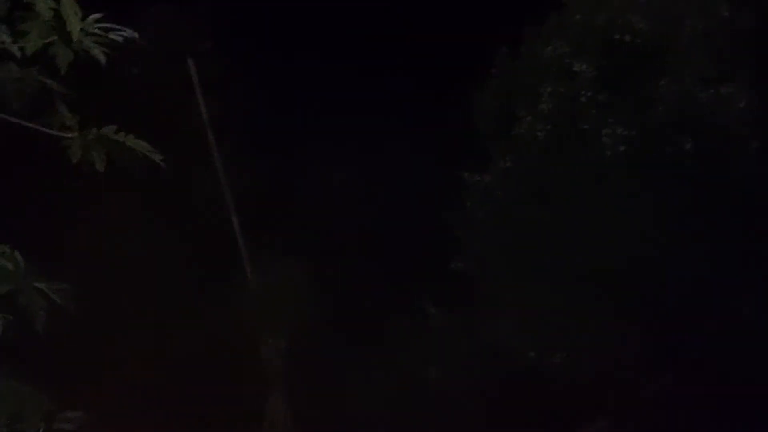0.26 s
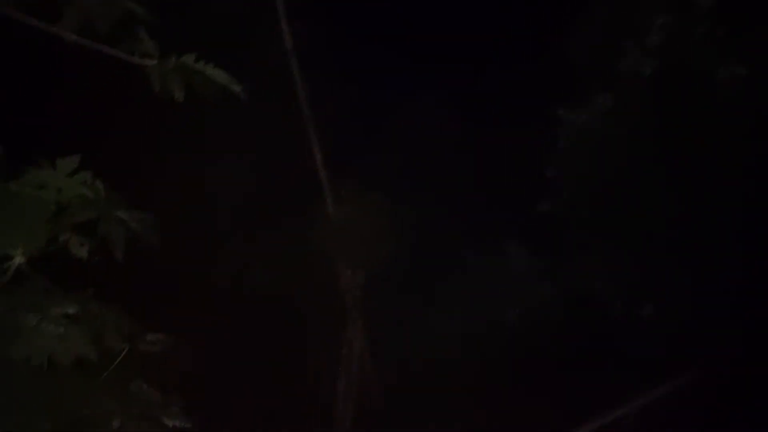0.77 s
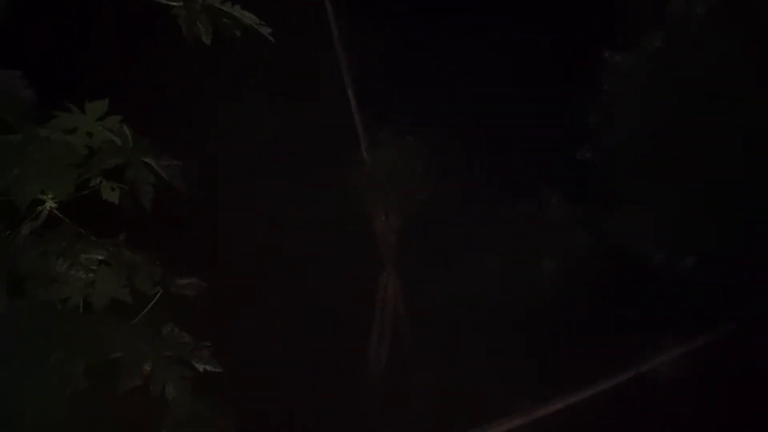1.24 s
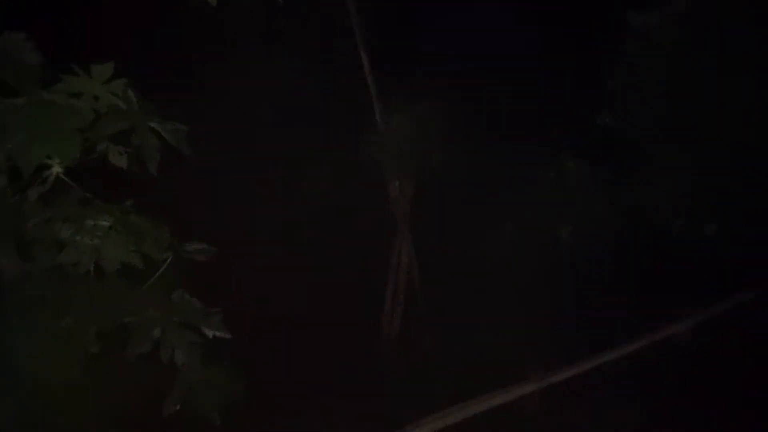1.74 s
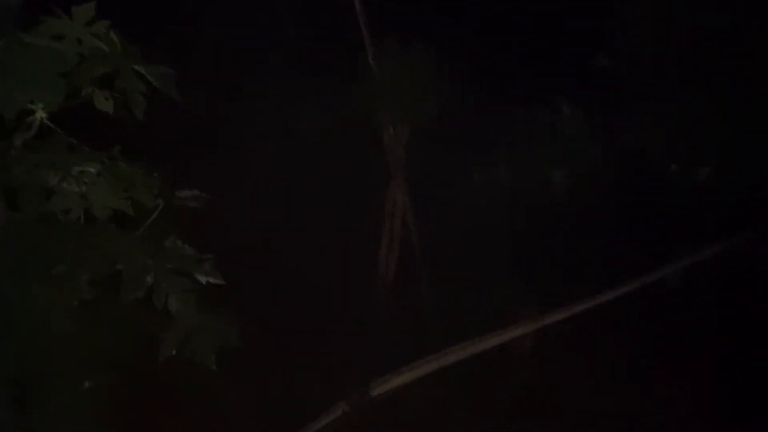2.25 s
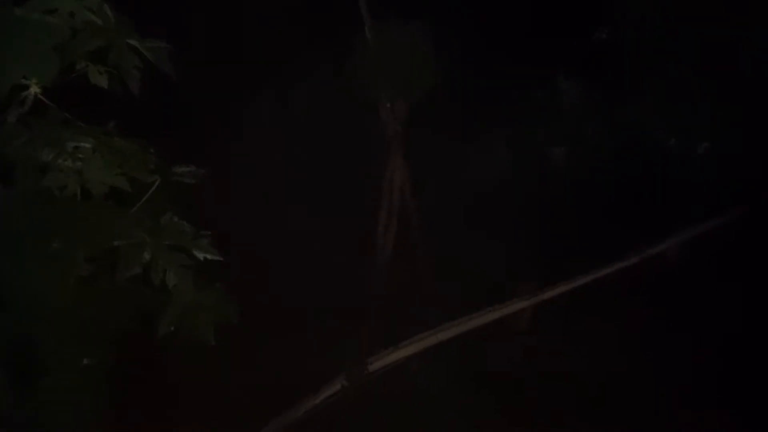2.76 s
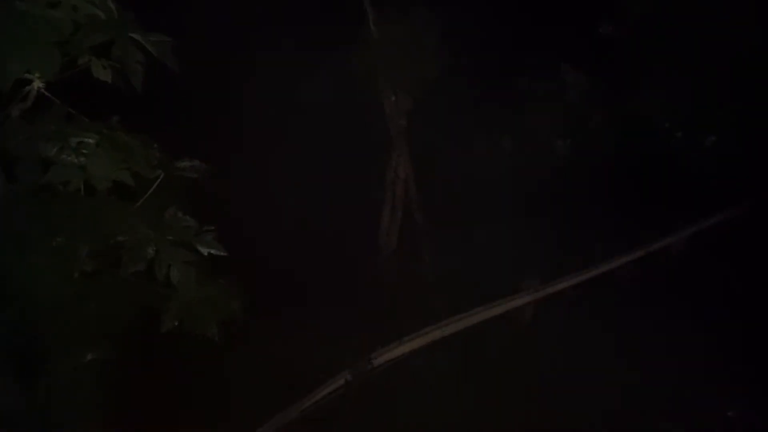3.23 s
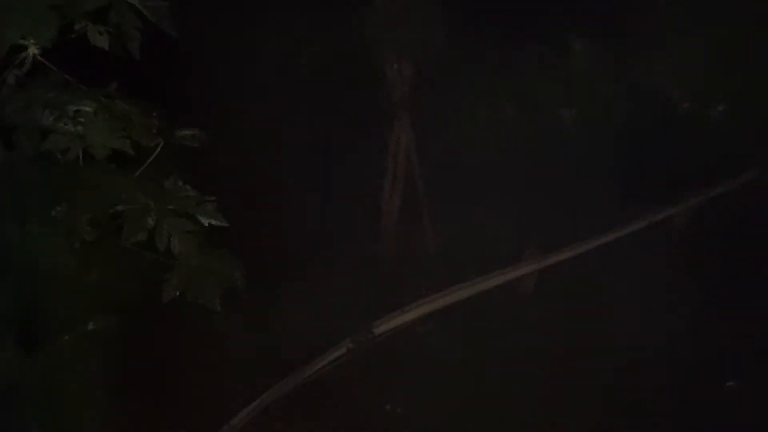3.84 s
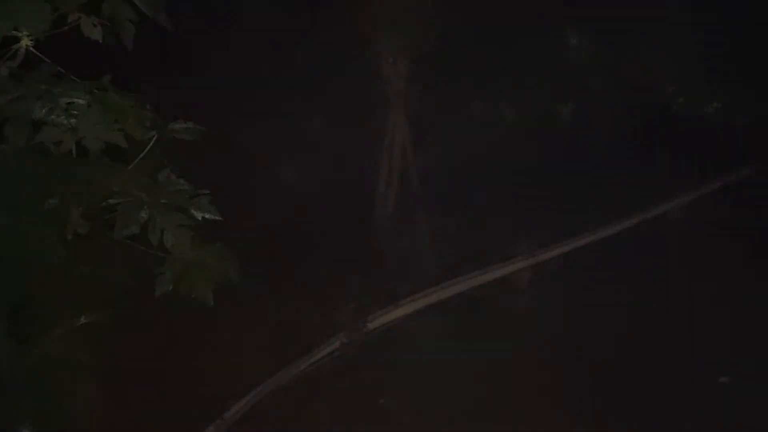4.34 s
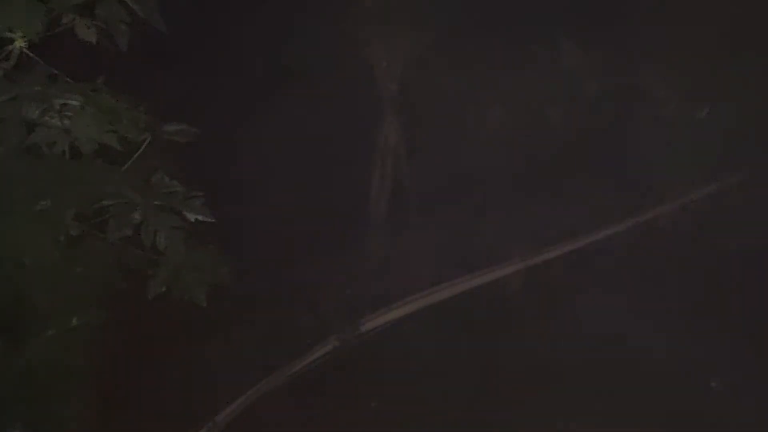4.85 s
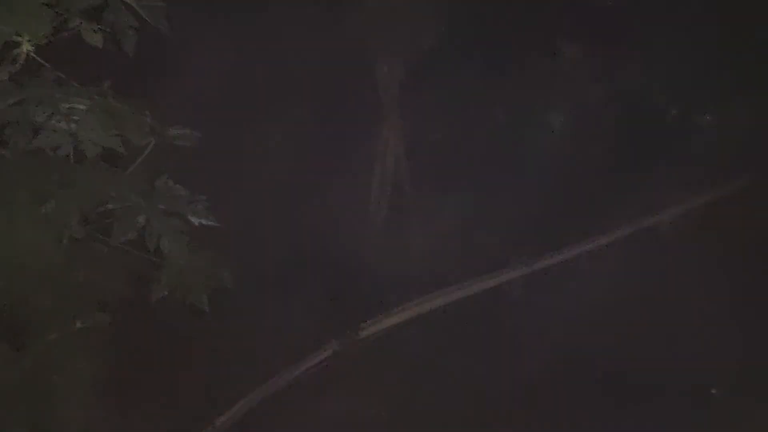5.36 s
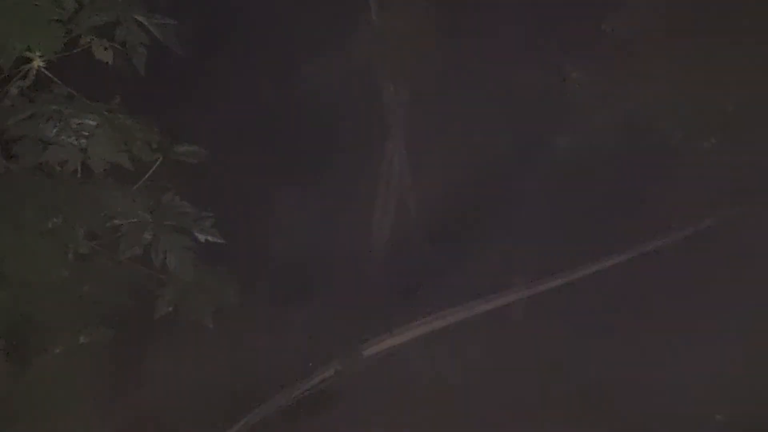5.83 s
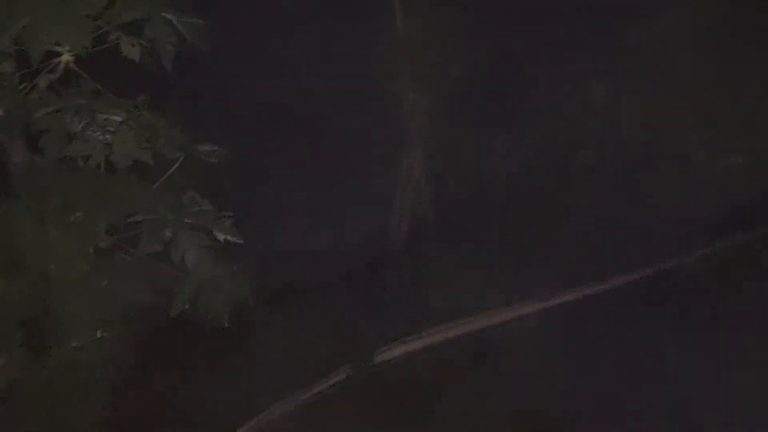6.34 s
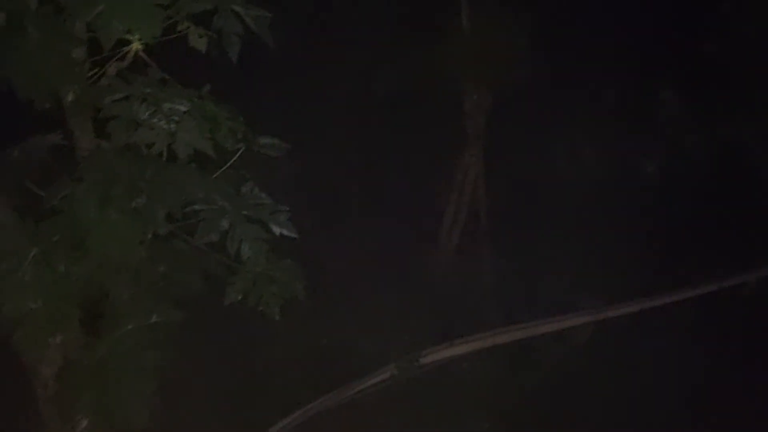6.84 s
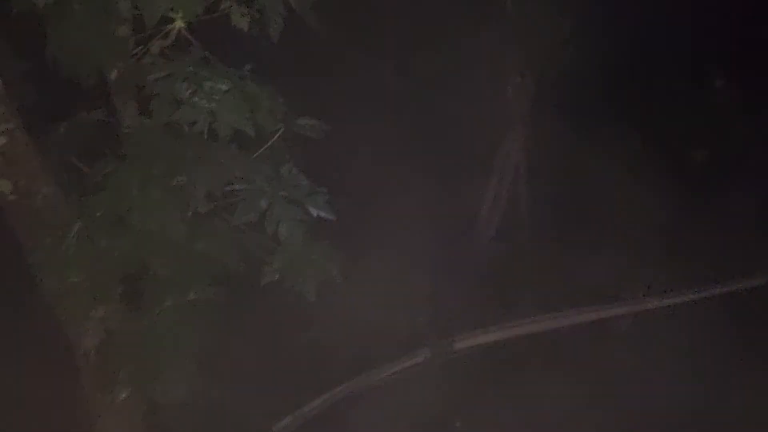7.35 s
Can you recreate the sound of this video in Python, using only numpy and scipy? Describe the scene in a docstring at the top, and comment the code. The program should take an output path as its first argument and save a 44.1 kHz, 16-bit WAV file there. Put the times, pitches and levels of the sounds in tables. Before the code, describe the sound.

Night insects layered near and far, heard in stereo from beside leafy bushes, weighted to the right. Quick pips and rasps begin over hissing air, low hum and steady high buzz; then a mid-high cricket trills in long runs while a close one throws in bright, rising chirps. Lower chirps cluster before three seconds, rolled chirps and a rapid row of five snaps follow past four, and trilling continues almost to the end.

```python
"""A garden at night, heard by a phone whose right port faces the bushes. From the start: shaped noise (air), a low beating
hum, a far chorus in flickering bands, a wash, and a katydid's buzz from regular strokes of hiss. Rolled chirps, pips,
rasps of filtered file clicks and throbbing low notes join early, then short chirps, rising at close range,
and a cricket's long trills of falling tones; five high snaps come past the middle.
Direct sound, ground, leaves and a hard surface give every near song a short echo."""
import sys
import numpy as np
from scipy import signal
from scipy.fft import rfft, irfft, next_fast_len
from scipy.io import wavfile
from scipy.ndimage import uniform_filter1d

SR = 44100
rng = np.random.default_rng(int(sys.argv[2]) if len(sys.argv) > 2 else 0)


def waveform_to_disk(signal):
    """Save audio, clipped to [-1, 1], as 16-bit WAV at the path in sys.argv[1]."""
    frames = np.transpose(np.atleast_2d(signal))
    scaled = np.clip(frames, -1, 1) * 32767
    samples = np.round(scaled).astype(np.int16)
    wavfile.write(sys.argv[1], SR, samples)


N = 334703
T = np.arange(N) / SR  # time [s]

# night air at the right port: (frequency [Hz], density [dB per Hz])
AIR_SPECTRUM = [(25, -108), (40, -97), (70, -86.5), (150, -91), (330, -96), (640, -107), (1500, -114.5),
                (2600, -116), (3600, -103), (7000, -103), (11000, -103), (15700, -110)]
# the two ports in the night air: (frequency [Hz], left minus right [dB], likeness [-1 to 1])
AIR_PORTS = [(60, -3.5, 0.59), (250, -2.5, 0.59), (645, 1, 0.043), (1410, 1.2, -0.14), (2600, 1.5, 0.22),
             (4000, -3, -0.33), (15000, -15.5, 0.024)]
# narrow wavering bands of the hum: (frequency [Hz], width [Hz], level against the swell [dB])
HUM_BANDS = [(98.3, 28, -8.5), (131, 19, -5), (204.3, 47, -12), (258.6, 26.4, -10.5)]
# steady tones in the hum, as of far motors: (frequency [Hz], level against the swell [dB])
MOTOR_TONES = [(127, -6.5), (133.5, -7.5), (150, -12.5), (196.5, -18.5), (202, -14.5)]
# swell of the hum: (time [s], level [dB], deepest band against it [dB])
HUM_SWELL = [(0, -62.5, -4), (1.5, -65, -1), (2.5, -66, -9), (3.6, -66.5, -10), (4.35, -58, -14),
             (4.7, -63, -17), (5.6, -68.5, -8), (6.4, -61, -12), (6.9, -66.5, -10), (7.59, -71.5, -26)]
# far chorus bands: (frequency [Hz], width [Hz], level [dB])
CHORUS_BANDS = [(3124, 210, -64), (4665, 430, -62.5), (5410, 790, -62.5), (6240, 590, -70),
                (2780, 76, -79.5), (3970, 840, -68.5), (2140, 340, -82.5)]
# far katydids that run together: (time [s], level [dB])
WASH_LEVELS = [(0, -55.5), (.35, -81), (.93, -64), (1.15, -82), (1.67, -59.5), (2.62, -59), (3.22, -69.5),
               (3.4, -54), (3.68, -61), (4.57, -77), (4.9, -69), (5.2, -77), (5.66, -59), (5.96, -64),
               (6.19, -57), (6.35, -58), (7.59, -75)]
# steady katydid buzz: (time [s], level [dB])
BUZZ_LEVELS = [(0, -57), (.76, -60), (.93, -52.5), (1.2, -58.5), (2.26, -55.5), (3.45, -56.5),
               (3.89, -52.5), (4.44, -58), (4.75, -55.5), (6.9, -55.5), (7.59, -59.5)]
# bouts of rolled chirps from a farther cricket: (first chirp [s], chirps [count], first level [dB], last level [dB])
ROLL_BOUTS = [(-.02, 1, -45, -45), (4.33, 9, -50.5, -47.5), (6.772, 1, -50, -50), (7.05, 1, -52, -52)]
# bouts of short steady pips: (first pip [s], pips [count], first level [dB], last level [dB])
PIP_BOUTS = [(0.019, 1, -49, -54), (.15, 5, -47, -42.5), (5.03, 1, -48, -50), (5.224, 4, -47.5, -49),
             (7.1, 4, -40.5, -43)]
# thin passing whistles: (middle [s], level [dB], middle pitch [Hz], length [s], fall [Hz])
WHISTLES = [(7.192, -57, 5780, 0.25, 37.3)]
# katydid rasps, Gaussian in time: (middle [s], nominal length [s], level [dB], voice [name])
RASP_CALLS = [(.06, .12, -64, "hollow"), (0.3, 0.16, -57, "even"), (0.442, .15, -62, "even"),
              (0.809, .21, -48.5, "even"), (0.926, 0.089, -46, "even"), (1.023, 0.16, -51, "even"),
              (1.31, 0.096, -43, "high"), (1.382, 0.091, -45.5, "high"), (1.484, 0.13, -38.5, "hollow"),
              (1.67, .09, -60, "even"), (1.938, 0.16, -49.5, "even"), (2.09, 0.12, -54.5, "hollow"),
              (2.369, 0.14, -51, "even"), (2.65, .13, -46.5, "even"), (3.275, .13, -38, "hollow"),
              (3.45, 0.14, -51, "middle"), (3.62, .18, -48.5, "even"), (3.903, 0.16, -52, "even"),
              (4.377, 0.18, -55.5, "even"), (4.74, .14, -58, "even"), (4.921, .21, -47.5, "even"),
              (5.524, .18, -48.5, "even"), (6.006, .13, -37.5, "hollow"), (6.168, .16, -52, "even"),
              (6.36, 0.18, -50, "even"), (6.432, .11, -55, "high"), (6.7, 0.13, -50, "middle"),
              (7.144, 0.096, -53.5, "middle"), (7.377, 0.12, -63, "even")]
# wing resonances of the rasps: (frequency [Hz], width [Hz])
WING_RESONANCES = [(8400, 2540), (11000, 2240), (14000, 3400)]
# colour of each voice: name: (level in first, second, third wing resonance [dB])
VOICE_COLOURS = {"even": (.1, -1.4, -1.3), "hollow": (-3.6, -10.5, 0), "high": (-13, -14.5, 0),
                 "middle": (-6, 0, -5.5)}
# low notes, perhaps a small frog: (start [s], length [s], level before FROG_PEAK_DB [dB], left minus right [dB])
FROG_NOTES = [(0.096, 0.094, -69, -16), (0.367, 0.102, -77.5, -13.5), (0.687, 0.132, -73, -6),
              (0.968, 0.104, -75, 0.0), (1.281, 0.134, -74, -8.0), (1.634, 0.084, -80, 0),
              (1.948, 0.128, -80, -3.0), (2.279, 0.12, -76, -8.5), (2.624, 0.108, -73, -11.0),
              (2.921, 0.098, -77.5, -9.0), (3.227, 0.09, -83, 1), (3.534, 0.169, -78, -5),
              (3.911, 0.056, -74, -3), (4.187, 0.096, -75, -6.5), (4.516, 0.126, -77.5, -3),
              (4.831, 0.11, -76, -10), (5.156, 0.124, -78, -3.5), (5.458, 0.144, -75, -6),
              (5.763, 0.146, -71, -4.5), (6.104, 0.148, -71, -4), (6.423, 0.092, -76.5, -6),
              (6.707, 0.167, -75.5, -16), (7.012, 0.084, -76, -15.0), (7.353, 0.062, -75, -16.5)]
# chirps of a lower singer, a soft stroke before the full ones:
# (last stroke [s], level [dB], full strokes [count], soft stroke against them [dB])
LOW_CHIRPS = [(.31, -50.5, 2, -5), (.58, -51.5, 2, -8), (2.012, -47.5, 1, -6), (2.259, -39, 2, -17),
              (2.505, -38.5, 2, -6), (2.749, -38, 2, -6), (2.948, -38, 1, -9), (7.2, -57, 2, 2)]
# four-stroke chirps close by:
# (last stroke [s], strongest stroke's level [dB], last pitch [Hz], left minus right [dB], first stroke's shortfall [dB])
CLOSE_CHIRPS = [(1.012, -24, 6010, -14, -20), (1.858, -30.5, 6230, -11, -17), (3.46, -26.5, 6090, -13, -14),
                (4.175, -28.5, 6250, -8.5, -17), (5.877, -24.5, 6110, -14, -17),
                (6.471, -27.5, 6220, -10, -16)]
# growth of a close chirp, one entry per stroke: (share of the first stroke's shortfall [ratio])
SHORTFALL_SHARES = [1, .48, 0, .05]
# runs of the trilling cricket, strokes evenly spaced between rows: (time [s], strokes so far [count], level [dB])
TRILL_RUNS = [
    [(.597, 0, -47.5), (.767, 5, -39.5), (1.012, 12, -39.5), (1.157, 15.5, -43), (1.39, 21, -42)],
    [(1.934, 0, -43.5), (2.072, 4, -40.5), (2.414, 14, -39), (2.534, 17, -41), (2.727, 21, -38.5),
     (2.762, 22, -41), (2.955, 27, -41), (3.007, 28, -46.5)],
    [(3.423, 0, -56.5), (3.49, 2, -43.5), (3.69, 8, -39.5), (3.931, 15, -39.5), (4.283, 24, -39.5),
     (4.435, 28, -41), (4.749, 37, -40), (4.824, 39, -40.5), (4.97, 42, -44)],
    [(5.429, 0, -41), (5.563, 4.5, -39.5), (5.869, 13, -37), (5.978, 16, -38.5), (6.173, 21, -36),
     (6.277, 23, -39), (6.366, 25, -37), (6.606, 32, -37), (6.75, 36, -37.5), (6.932, 41, -38.5),
     (7.012, 43, -38), (7.126, 45, -40.5)],
]
# perch of each run: (middle pitch [Hz], far echo [dB], near paths' left-port gain [dB])
TRILL_PERCHES = [(3300, 1.5, -3), (3285, -2, -8.5), (3270, -4, -11.5), (3285, -5, -10.5)]

# two close tones that beat; the lower one's level is against the upper
BEAT_HZ, BEATS_PER_S, BEAT_NULL_S = 104., 2.958, .17  # upper pitch, beat rate, a moment of cancelling
BEAT_DB, BEAT_LOWER_DB, DEEP_HZ = 1, -2, 49.
CHIRP_GAP_S, LOW_GAP_S, ROLL_GAP_S, PIP_GAP_S = .0462, .049, .2705, .1325
FROG_LEAD_S, FROG_PEAK_DB = .02, 8.5
CHIRP_RISE_HZ = 46.4  # from stroke to stroke
REACH_PER_DB, SHORTEST = .034, .4  # weaker strokes cover less of the file
LOW_HZ, LOW_SAG_HZ, LOW_PAN_DB = 5050, 60, -9.5  # last pitch, fall per stroke, left minus right
TRILL_SCATTER_DB, TRILL_SCATTER_S = 1.3, .0015
TICK_START_S, TICK_GAP_S, TICK_DB, FIRST_TICK_DB = 4.34, .0718, -23, -3
TOP_HZ = 15800


def undb(db):
    """Decibels are twenty times the logarithm of a pressure ratio; this returns the ratio."""
    return 10 ** (np.asarray(db) / 20)


def unit(x):
    """Root-mean-square pressure sets the level; scale it to 1."""
    return x / np.sqrt(np.mean(x ** 2))


def band(x, hz, width_hz, order=2):
    """A resonance passes a band of a signal; a higher order gives a flatter top and steeper edges."""
    size = next_fast_len(N)
    f = np.fft.rfftfreq(size, 1 / SR)
    gain = np.exp(-np.abs(np.sqrt(2) * (f - hz) / width_hz) ** order)
    return irfft(rfft(x, size) * gain)[..., :N]


def walk(rate):
    """Slow random fluctuation: levels about 0, held 1 / rate seconds and smoothed twice, with rms 1."""
    hold = int(SR / rate)
    steps = np.repeat(rng.standard_normal(N // hold + 1), hold)
    smooth = uniform_filter1d(uniform_filter1d(steps, hold), hold)
    return unit(smooth[:N])


def garden(x, left_db, leaves_db, echo_db, t60_s, wall_db=-15.5, wall_s=.038, shade_db=-1.5, ground_db=-6.0):
    """Multipath propagation: direct sound, ground, near leaves, one hard surface and each port's fading scatter."""
    t = np.arange(int(.6 * SR)) / SR
    near, far = rng.standard_normal((2, 2, len(t)))
    near *= np.exp(-t / 0.024)
    far *= np.exp(-np.log(1000) * t / t60_s) * (1 - np.exp(-t / 0.013))
    near = undb(leaves_db) * near / np.linalg.norm(near[0])
    far = undb(echo_db) * far / np.linalg.norm(far[0])
    far[:, int(wall_s * SR)] += undb(wall_db)
    for port, lag in enumerate((16, 0)):  # the left port hears later [samples]
        near[port, lag] += 1
        near[port, lag + int(.005 * SR)] -= undb(ground_db)
    # the phone's body shades the left port, by separate amounts for near paths and for sound from all round
    near = near * undb([[left_db], [0]])
    far = far * undb([[shade_db], [0]])
    x = x * np.ones((2, 1))
    out = 0
    for source, paths in ((x, near), (x[[1, 1]], far)):
        wet = signal.fftconvolve(source, paths, axes=1)[:, :N]
        # the paths spread a song in time; its energy follows the sum of their energies
        energy = np.linalg.norm(paths, axis=1) * np.std(source, axis=1)
        out = out + wet * (energy / np.std(wet, axis=1))[:, None]
    return out * np.std(x[1]) / np.std(out[1])  # the right port keeps the song's level


def add(out, s, db, hz, length_s, fall_hz, octave_db=-52.0, lean=0., bend=0.):
    """A gliding tone, as a file run over a scraper: lean moves the peak late, bend steepens the late fall."""
    t = np.arange(-length_s / 2, length_s / 2, 1 / SR)
    fall = fall_hz * (t ** 2 / (2 * length_s) + bend * t ** 3 / (3 * length_s ** 2))  # in cycles
    phase = 2 * np.pi * (hz * t - fall + rng.random())
    tone = np.sin(phase) + undb(octave_db) * np.sin(2 * phase)
    shape = np.sqrt(np.hanning(len(t))) * (1 + lean * t / length_s)
    at = (t * SR + s * SR).astype(int)
    inside = (at >= 0) & (at < N)
    out[at[inside]] += (undb(db) * shape * tone)[inside]


def bout(gap_s, first_s, count, first_db, last_db):
    """Periodic calling: times and levels of evenly repeated calls whose level drifts."""
    count = int(round(count))
    return zip(first_s + gap_s * np.arange(count), np.linspace(first_db, last_db, count))


def teeth(rate, jitter, scatter_db, decay_s):
    """Impulsive excitation by file teeth: uneven clicks that decay exponentially."""
    chance = rng.standard_normal((int(N / SR * rate * 1.2), 2))
    at = np.cumsum(SR / rate * np.exp(jitter * chance[:, 0])).astype(int)
    inside = at < N
    clicks = np.zeros(N)
    clicks[at[inside]] = undb(scatter_db * chance[inside, 1])
    return unit(signal.lfilter([1], [1, -np.exp(-1 / (decay_s * SR))], clicks))


def air():
    """Partly coherent broadband noise: each frequency has its own level, port balance and likeness."""
    size = next_fast_len(N)
    at = np.log(np.fft.rfftfreq(size, 1 / SR) + 1)
    hz, db = np.transpose(AIR_SPECTRUM)
    port_hz, left_db, like = np.transpose(AIR_PORTS)
    left_db = np.interp(at, np.log(port_hz), left_db)
    like = np.clip(np.interp(at, np.log(port_hz), like), -1, 1)
    colour = undb(np.interp(at, np.log(hz), db)) * np.sqrt(SR / 2)
    right, other = rfft(rng.standard_normal((2, size))) * colour
    left = undb(left_db) * (like * right + np.sqrt(1 - like ** 2) * other)
    return irfft(np.array([left, right]), size)[:, :N]


def hum():
    """Interference: two close tones beat, among narrow noise bands and motor tones that share one swell."""
    s, swell_db, deep_db = np.transpose(HUM_SWELL)
    deep_db = np.interp(T, s, deep_db)
    bands = 0
    for hz, width_hz, db in HUM_BANDS + [(45.9, 14, deep_db - 2.0)]:
        mid, side = unit(band(rng.standard_normal((2, N)), hz, width_hz))
        bands = bands + undb(db) * np.array([undb(-6.0) * (mid + 0.61 * side), mid])
    turn = 2 * np.pi * np.array([[.12], [0]])  # the left port hears the tones a little shifted
    tones = 0
    for hz, db in MOTOR_TONES + [(DEEP_HZ, deep_db - 1.0)]:
        level = undb(db + 2.9 * walk(2.03))
        tones = tones + level * np.sin(2 * np.pi * (hz * T + rng.random()) + .5 * walk(1) + turn)
    phase = 2 * np.pi * (BEAT_HZ * T + rng.random()) + turn
    lower = undb(BEAT_LOWER_DB) * np.sin(phase - 2 * np.pi * BEATS_PER_S * (T - BEAT_NULL_S))
    tones = tones + undb(BEAT_DB + 1.5 * walk(1.77)) * (np.sin(phase) - lower)
    return (bands + tones * undb([[-6.5], [0]])) * undb(np.interp(T, s, swell_db))


def chorus():
    """Incoherent addition: many far singers blur into noise bands whose level flickers."""
    out = 0
    for hz, width_hz, db in CHORUS_BANDS:
        # a slow drift common to both ports, a quick flicker of each port's own
        flicker = undb(db + 1.5 * walk(2.5) + 1.2 * np.array([walk(28), walk(28)]))
        hiss = unit(band(rng.standard_normal((2, N)), hz, width_hz))
        out = out + flicker * hiss * undb([[-6.5], [0]])
    return out


def wash():
    """Incoherent addition: far rasps, too many to tell apart, merge into one broad band of noise."""
    hiss = unit(band(rng.standard_normal((2, N)), 10800.0, 6500.0, order=4))
    level_db = np.interp(T, *np.transpose(WASH_LEVELS)) + 2.5 * walk(4)
    return hiss * undb(level_db + np.array([[-7.], [0]]))


def buzz():
    """Forced resonance: regular strokes of hiss in a wing resonance with a narrower peak near its top."""
    scrape = teeth(126.5, 0.017, 0.56, 0.0016) * rng.standard_normal(N)
    hiss = band(scrape, 9220.0, 1000.0) + 0.65 * band(scrape, 9434.0, 320.)
    level = undb(np.interp(T, *np.transpose(BUZZ_LEVELS)))
    return garden(unit(hiss) * level, -25.0, -17.0, 1.8, 0.3)


def roller():
    """Scattering over distance blurs chirps of eight quick strokes, loudest in the middle."""
    out = np.zeros(N)
    for row in ROLL_BOUTS:
        for s, db in bout(ROLL_GAP_S, *row):
            for k in np.arange(8) - 3.5:  # strokes from the middle of the chirp, 54 a second
                hz = 3890 + 45 * rng.standard_normal()
                add(out, s + k / 54., db - .3 * k ** 2, hz, .022, 550., lean=-0.32)
    return garden(out * (1 + .6 * walk(300)), -2.5, 9.0, 5., 0.3, shade_db=-5.5)


def pips():
    """Harmonic tones: pips of nearly steady pitch with a faint octave, and a thin whistle."""
    out = np.zeros(N)
    for row in PIP_BOUTS:
        for s, db in bout(PIP_GAP_S, *row):
            add(out, s, db, 3345., .032, 60., octave_db=-21.5)
    for s, db, hz, length_s, fall_hz in WHISTLES:
        add(out, s, db, hz, length_s, fall_hz)
    return garden(out * (1 + 0.15 * walk(150)), -14.0, -10.5, -9., 0.13, wall_db=-15.5)


def rasps():
    """Source and filter: a swell of dense file teeth drives three broad wing resonances."""
    scrape = teeth(390, .3, 0.83, 0.0026) * rng.standard_normal(N)
    out = np.zeros(N)
    for k, (hz, width_hz) in enumerate(WING_RESONANCES):
        swell = np.zeros(N)
        for s, length_s, db, voice in RASP_CALLS:
            start = max(int((s - 2 * length_s) * SR), 0)
            near = slice(start, int((s + 2 * length_s) * SR))
            shape = np.exp(-8 * ((T[near] - s) / length_s) ** 2)
            swell[near] += undb(db + VOICE_COLOURS[voice][k]) * shape
        out += swell * unit(band(scrape, hz, width_hz, order=4))
    return garden(out, -8.5, 4.5, -4.5, 0.52, wall_db=-15.0, shade_db=-6.0)


def frog():
    """Amplitude modulation roughens a throbbing low note; several callers, so the side changes."""
    out = np.zeros((2, N))
    for s, length_s, db, pan_db in FROG_NOTES:
        hz = 2200 + 15 * rng.standard_normal()
        middle_s = s + length_s / 2 - FROG_LEAD_S
        for port, side_db in enumerate((pan_db, 0)):
            add(out[port], middle_s, db + FROG_PEAK_DB + side_db, hz, length_s, 30., lean=0.16)
    out *= 1 + .3 * np.sin(2 * np.pi * 105 * T) + .6 * walk(140)
    return garden(out, -.5, -1.0, -6., 0.18, wall_db=-20.0, shade_db=-4.)


def chirp_stroke(out, length_s, fall_hz, s, db, short_db, hz, pan_db):
    """Stridulation: a harder stroke covers more of the file, so it sweeps wider and lasts longer."""
    reach = np.clip(1 + REACH_PER_DB * short_db, SHORTEST, 1)
    for port, side_db in enumerate((pan_db, 0)):
        add(out[port], s, db + short_db + side_db, hz, length_s * np.sqrt(reach), fall_hz * reach,
            octave_db=-29.5, lean=0.13)


def chirpers():
    """Stridulation in wide fast sweeps: a lower singer deep in the bushes, and rising chirps close by."""
    close, deep = np.zeros((2, 2, N))
    # k counts strokes back from the last of the chirp
    for s, db, full, soft_db in LOW_CHIRPS:
        full = round(full)
        for k in range(full + 1):
            chirp_stroke(deep, .028, 950., s - k * LOW_GAP_S, db, soft_db * (k >= full),
                         LOW_HZ + k * LOW_SAG_HZ, LOW_PAN_DB)
    for s, db, hz, pan_db, first_db in CLOSE_CHIRPS:
        for k, share in enumerate(SHORTFALL_SHARES[::-1]):
            chirp_stroke(close, .024, 1280., s - k * CHIRP_GAP_S, db, first_db * share,
                         hz - k * CHIRP_RISE_HZ, pan_db)
    close *= 1 + .25 * walk(300)
    near = garden(close, 1., -7., -7., .3, wall_db=-18., shade_db=-5., ground_db=-3.)
    return near + garden(deep, -.6, 0., 2.5, 0.22, wall_db=-16., shade_db=-5.5, ground_db=-6.0)


def triller():
    """Stridulation: each stroke sweeps down and stops short; the file catches a little unevenly."""
    total = 0
    for run, (hz, echo_db, left_db) in zip(TRILL_RUNS, TRILL_PERCHES):
        out = np.zeros(N)
        at, stroke, level_db = np.transpose(run)
        for k in np.arange(np.ceil(stroke[0]), stroke[-1] + .01):
            late, loud, sharp = rng.standard_normal(size=3)
            s = np.interp(k, stroke, at) + TRILL_SCATTER_S * late
            db = np.interp(k, stroke, level_db) + TRILL_SCATTER_DB * loud
            add(out, s - .002, db, hz + 10 * sharp, .022, 470., lean=1.5, bend=0.45)
        out *= 1 + 0.32 * walk(220)
        total = total + garden(out, left_db, -10., echo_db, .21, wall_db=-26., shade_db=-6., ground_db=-10.)
    return total


def ticks():
    """Heavy damping: five even snaps of a high wing tone under a millisecond long, the first one softer."""
    out = np.zeros(N)
    for k in range(5):
        add(out, TICK_START_S + k * TICK_GAP_S, TICK_DB + FIRST_TICK_DB * (k == 0), 13500., .0006, 1500.)
    return garden(out, -12.0, 2.0, -2.0, 0.26, wall_db=-19.0, wall_s=.04, shade_db=-10.0)


def scene():
    """Superposition: the pressures of all singers add to the night floor."""
    floor = air() + hum() + chorus() + wash()
    near = buzz() + roller() + pips() + rasps() + frog() + chirpers() + triller() + ticks()
    return floor + near


def record(dry):
    """Band limiting: the phone cuts the top with a steep low-pass filter."""
    low_pass = signal.ellip(12, .2, 70, TOP_HZ, fs=SR, output="sos")
    return signal.sosfilt(low_pass, dry)


dry = scene()
out = record(dry)
waveform_to_disk(out)
```